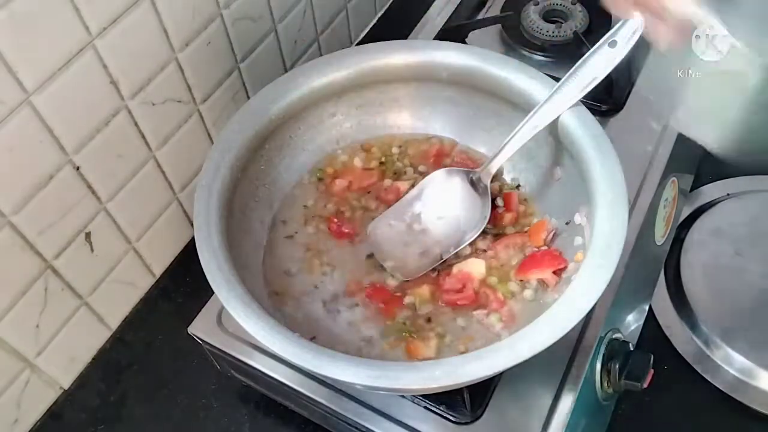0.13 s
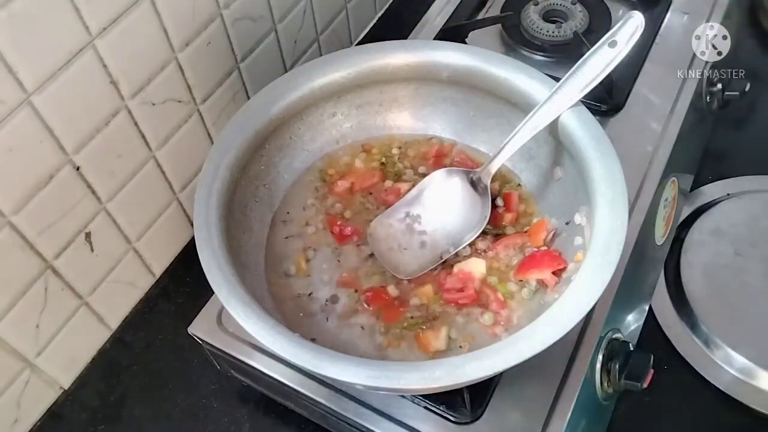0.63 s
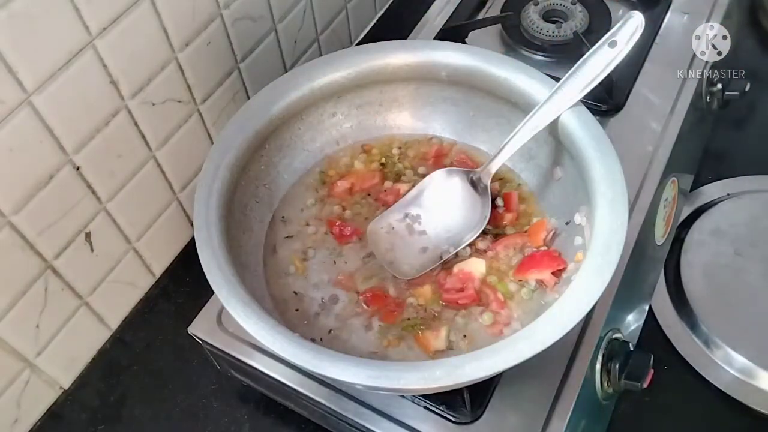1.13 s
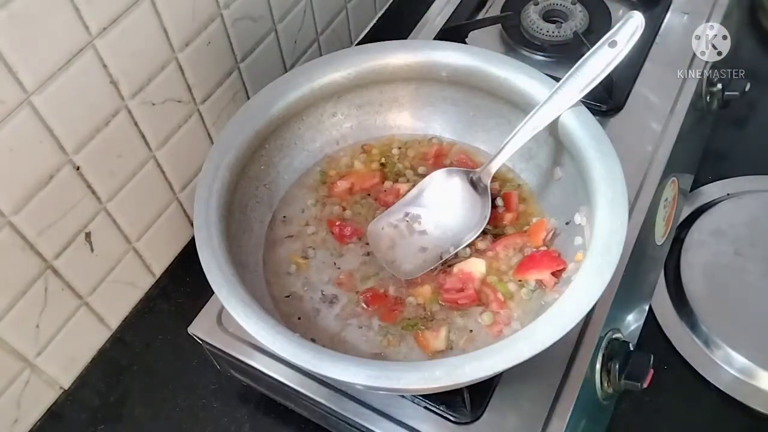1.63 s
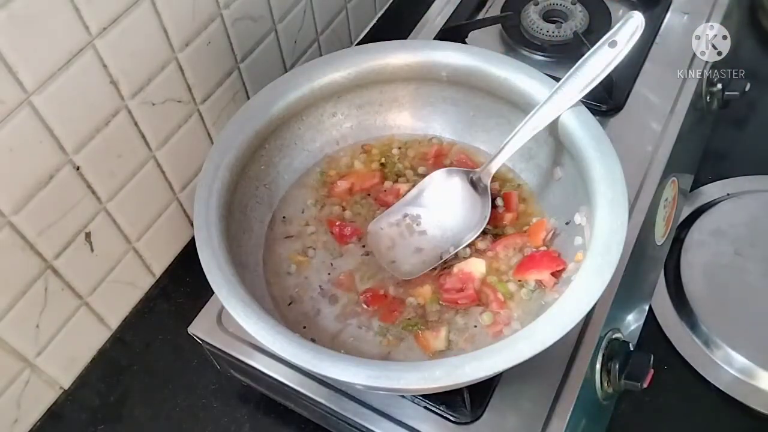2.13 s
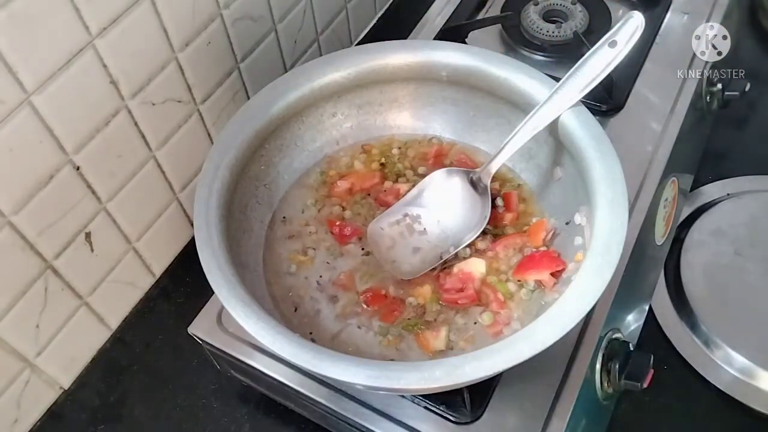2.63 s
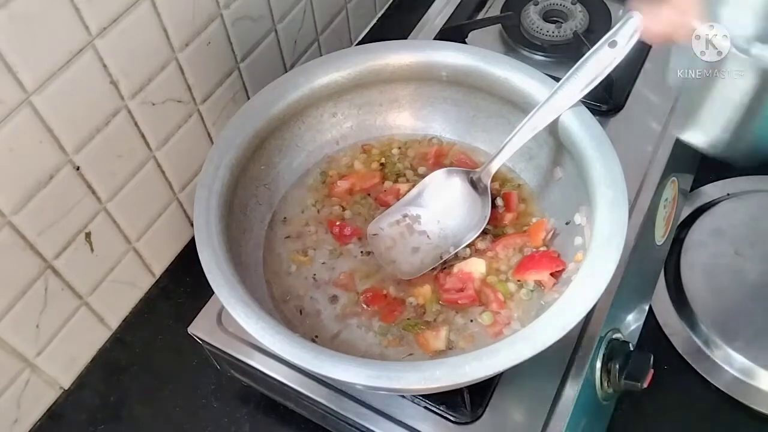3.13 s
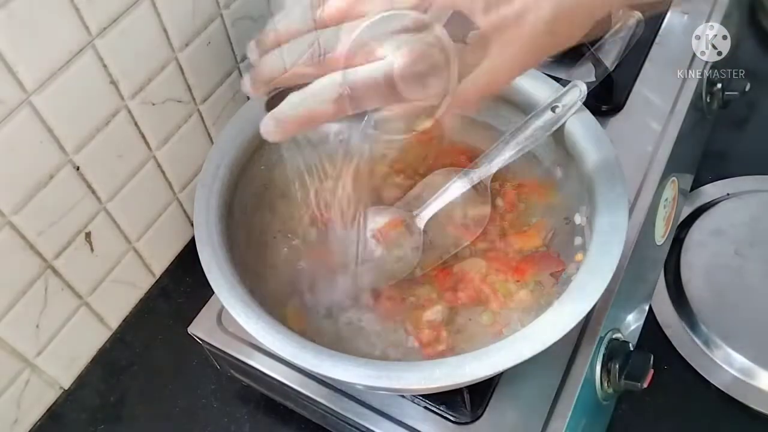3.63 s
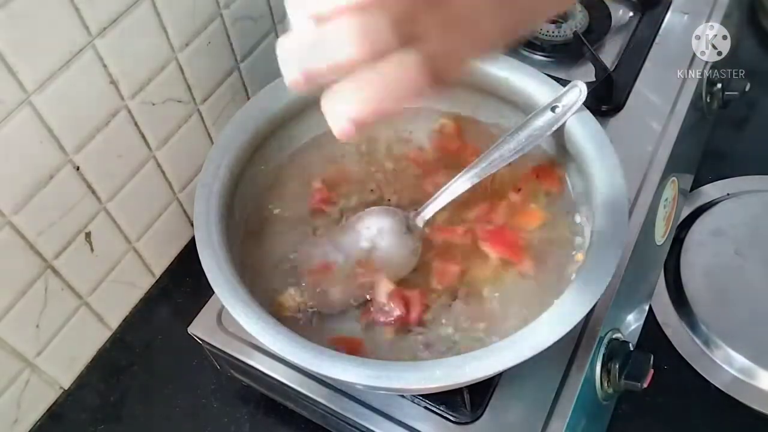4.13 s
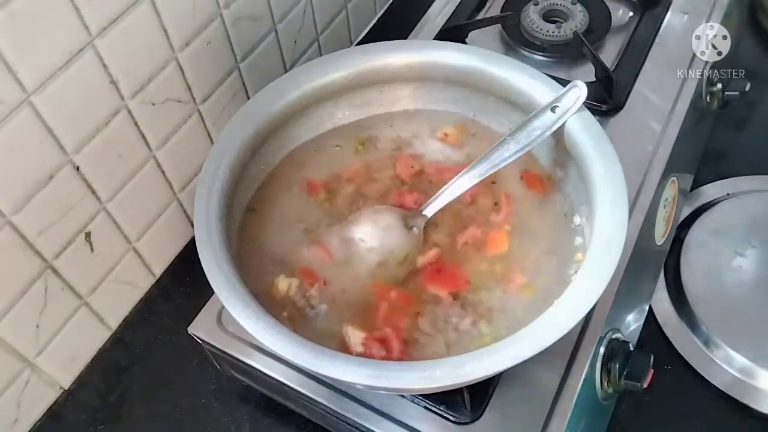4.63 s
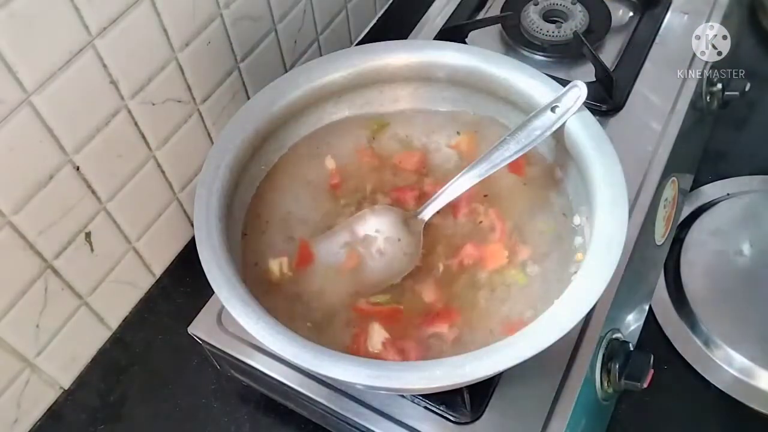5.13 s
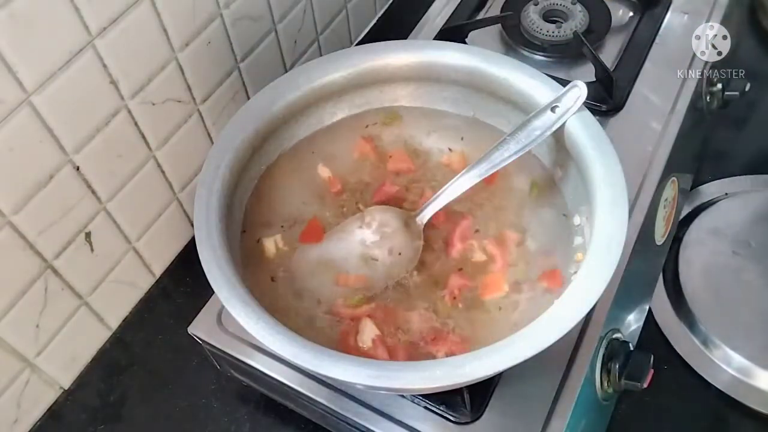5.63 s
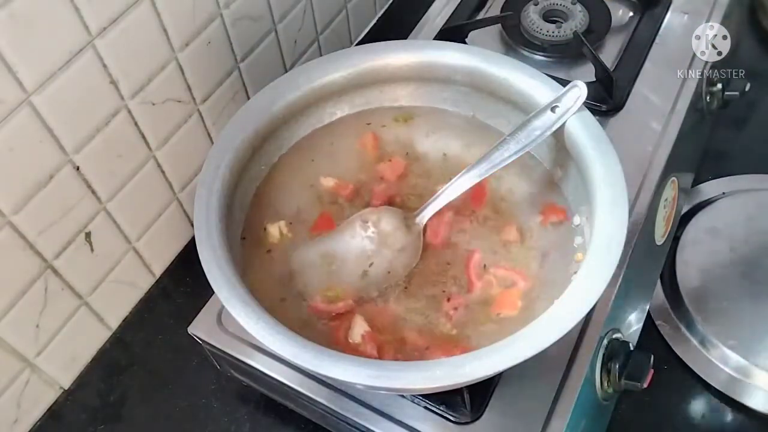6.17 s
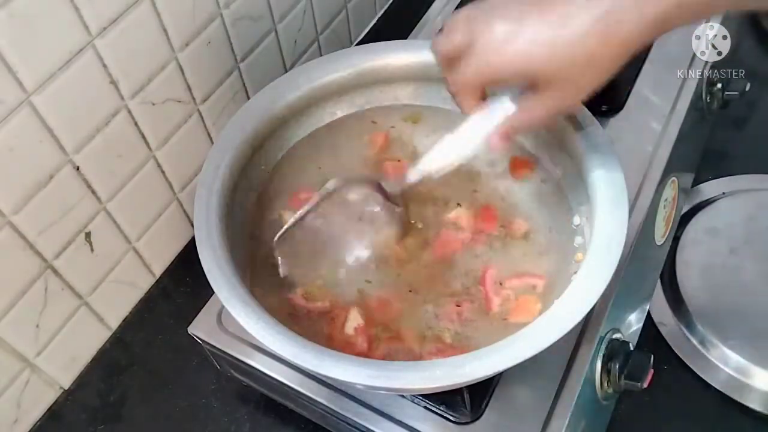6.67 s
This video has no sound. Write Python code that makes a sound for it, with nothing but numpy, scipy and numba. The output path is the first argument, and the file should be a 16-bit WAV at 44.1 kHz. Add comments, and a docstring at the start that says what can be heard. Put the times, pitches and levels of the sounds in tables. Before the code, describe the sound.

In a small, hard-tiled kitchen, heard close by a phone, a flickering hiss, low roar and steady hum sit over a faint rumble, easing during the first second. A very faint clink comes at 0.7 s. At about 0.95 s water splashes, crisp and hissing, with ticking drops and bubbling gurgles thinning by 2.3 s. A bright metallic lid clank rings at 2.4 s, then it grows quieter. A second, sharper splash bursts at 3.4 s, gurgling and pattering away until about 4.6 s. A steel tumbler is set down with a ringing clank at 5.05 s, a light knock follows, and it slides with a short scrape around 5.5 s. The hiss and roar swell near 6.1 s and sink. From 6.47 s a spoon strikes the pan in rapid loud knocks, ringing, then drags roughly through it with a low thump until the end at about 6.8 s.

```python
"""A changing hiss, low roar and hum are heard over a rumble in a small tiled kitchen, close to a phone; then
water splashes twice, probably from a tap into a tumbler. The hiss is flickering filtered noise, drops are
decaying tones with puffs of noise, bubbles are short rings of rising pitch. Steel ware is set down, slid
and knocked as decaying modes, and at the end a spoon strikes a pan and drags through it: a rough force
drives the pan's resonances."""
import sys
import numpy as np
from scipy import signal
from scipy.fft import rfft, irfft, next_fast_len
from scipy.io import wavfile
from scipy.ndimage import uniform_filter1d
from numba import njit

SR = 44100
rng = np.random.default_rng(int(sys.argv[2]) if len(sys.argv) > 2 else 0)


def gain_from_decibels(decibels):
    """Convert decibel values to linear amplitude factors."""
    exponent = np.asarray(decibels, float) / 20
    return 10 ** exponent


def output_pcm(signal):
    """Save a mono or channel-first signal as 16-bit PCM at the path in sys.argv[1].

    Samples are clipped to [-1, 1] before scaling.
    """
    pcm = np.clip(np.atleast_2d(signal).T, -1, 1) * 32767
    wavfile.write(sys.argv[1], SR, np.round(pcm).astype(np.int16))


N = 298992
M = next_fast_len(N)
HZ = np.fft.rfftfreq(M, 1 / SR)
T = np.arange(N) / SR


def table(points, hz=HZ):
    """Interpolation along a logarithmic frequency axis, holding the end values."""
    f, v = np.transpose(points)
    return np.interp(np.log(hz + 1), np.log(f), v)


def level_at(points, **outside):
    """Gain over time: the level of a (t/s, level/dB) table is interpolated in decibels."""
    s, db = np.transpose(points)
    return gain_from_decibels(np.interp(T, s, db, **outside))


def curves(rows):
    """Gains over time of a (t/s, level/dB, ..) table, silent outside its span."""
    s, *columns = np.transpose(rows)
    return np.array([gain_from_decibels(np.interp(T, s, c, left=-120, right=-120)) for c in columns])


def unit(x):
    """Normalisation to rms 1."""
    return x / np.sqrt(np.mean(x ** 2))


def colour(x, points):
    """Spectral shaping: filter by a level/dB curve over f/Hz, then scale to rms 1."""
    return unit(irfft(rfft(x, M) * gain_from_decibels(table(points)), M)[..., :N])


# Correlation of left and right noise: f/Hz, correlation (0-1)
CORRELATION = [(60, 0.45), (130, 0.71), (290, 0.7), (640, 0.34), (1410, 0.05), (3100, 0), (6820, 0.08),
               (15000, 0)]


def two_noises():
    """Diffuse field: left and right noise are partly alike in the bass, nearly unrelated in the treble."""
    mid, side = rfft(rng.standard_normal((2, M)))
    c = np.clip(table(CORRELATION), 0, 1)
    sides = np.sqrt(1 + c) * mid + np.sqrt(1 - c) * side * np.array([[1], [-1]])
    return unit(irfft(sides, M)[:, :N])


def resonances(x, peaks):
    """Forced vibration: a sum of resonances, each f/Hz, width/Hz, centre gain/dB."""
    return sum(gain_from_decibels(db) * signal.lfilter(*signal.iirpeak(hz, hz / w, SR), x) for hz, w, db in peaks)


def walk(rate):
    """Random fluctuation: values drawn at a rate in 1/s and slewed twice; spread near 1."""
    k = int(SR / rate)
    held = np.repeat(rng.standard_normal(N // k + 1), k)
    return 0.72 * uniform_filter1d(uniform_filter1d(held, k), k)[:N]


def fade(t, t60):
    """Exponential decay: 60 dB in t60 s."""
    return gain_from_decibels(-60 * t / t60)


def add(out, s, sound):
    """Superposition: mix a sound in at s seconds."""
    i = int(s * SR)
    out[i:i + len(sound)] += sound[:N - i]


def thin(x):
    """High-pass filter: the grains carry no bass below about 400 Hz."""
    return signal.sosfilt(signal.butter(3, 400., "high", fs=SR, output="sos"), x)


def room(x, wet_db, pan_db=0.):
    """Room impulse response: direct sound, later at the left port, stove and wall echoes, the tiles' tail."""
    tail_t60_s, treble_t60_s, treble_hz, early_t60_s = 0.38, 0.29, 5000., 0.019
    tail_db, early_db, left_lag_samples = -1, 1.5, 13
    t, echoes = T[:SR // 2], two_noises()[:, :SR // 2]
    dull = signal.lfilter(*signal.butter(2, treble_hz, fs=SR), echoes)
    tail = dull * fade(t, tail_t60_s) + (echoes - dull) * fade(t, treble_t60_s)
    tail *= gain_from_decibels(tail_db) / np.sqrt(tail_t60_s)
    early = echoes * gain_from_decibels(early_db) * fade(t, early_t60_s) / np.sqrt(early_t60_s)
    onset = np.minimum(t / 0.0022, 1)
    # the last root sets the energy of a decay independent of its length
    reply = gain_from_decibels(wet_db) * (early + tail) * onset * np.sqrt(6 * np.log(10) / SR)
    reply[[0, 1], [left_lag_samples, 0]] += 1  # direct sound
    pan = gain_from_decibels(np.array([[pan_db], [-pan_db]]) / 2)
    return signal.fftconvolve(x[None], reply, axes=1)[:, :N] * pan


@njit
def grains(starts, hz, cycles, glide, size, n, sr):
    """Damped oscillation: each grain falls by 1/e per `cycles` periods while its pitch climbs."""
    out = np.zeros(n)
    for k in range(len(starts)):
        phase, step, a = 0., 2 * np.pi * hz[k] / sr, size[k]
        loss = np.exp(-hz[k] / sr / cycles[k])
        for i in range(starts[k], min(n, starts[k] + int(6 * cycles[k] * sr / hz[k]))):
            out[i] += a * np.sin(phase)
            phase, step, a = phase + step, step * (1 + glide * hz[k] / sr), a * loss
    return out


def shower(level_db, busy, per_s, lo_hz, hi_hz, cycles, glide, spread_db):
    """Poisson-like process: grains at random moments, as dense as busy (0-1), of scattered pitch and size."""
    chance = rng.random((5, N))
    starts = np.flatnonzero(chance[0] < per_s * busy / SR)
    pitch, life, size = chance[1:4, starts]
    hz = lo_hz * (hi_hz / lo_hz) ** pitch
    size_db = level_db[starts] + np.minimum(-spread_db * np.log(size + 1e-9), 14)
    return grains(starts, hz, cycles * (0.22 + life), glide, gain_from_decibels(size_db), N, SR)


# Spectra of the two bass layers: f/Hz, relative density level/dB per Hz
DEEP_SPECTRUM = [(76, -45.5), (130, -26), (167, -0.5), (226, -8.5), (274, -1.5), (340, -8.5), (440, -7),
                 (750, -120)]
RUMBLE_SPECTRUM = [(15, -46), (25, -27), (53, 0), (75, 0.5), (102, -1), (150, -36), (200, -36), (330, -120)]
# Dull swells from stove, counter and hands: centre t/s, length/s, deep level/dB, rumble level/dB
BASS_SWELLS = [(.17, 0.16, -64, -70), (1.1, 0.25, -85, -71), (1.336, 0.24, -66, -67),
               (1.463, 0.57, -85, -68), (2.14, .12, -72, -71), (2.506, 0.89, -68, -70),
               (2.854, 0.13, -61.5, -82), (3.364, 0.14, -58, -72), (4.23, 0.28, -68, -83),
               (4.553, 0.46, -83, -59.5), (4.856, 0.089, -68, -65), (5.174, 0.32, -59, -59),
               (5.543, 0.17, -64, -75), (5.98, 0.35, -56.5, -82), (6.083, 0.14, -56.5, -66),
               (6.202, 0.45, -60.5, -66), (6.761, 0.27, -46, -45)]


def thumps():
    """Addition of powers: two layers of steady bass noise swell smoothly at each thump."""
    steady_db = [[-70.5], [-75]]  # deep, rumble
    power = np.ones((2, N)) * gain_from_decibels(steady_db) ** 2
    for s, length, *db in BASS_SWELLS:
        swell = np.cos(np.pi * np.clip((T - s) / length, -.5, .5)) ** 4
        power += gain_from_decibels(np.array(db))[:, None] ** 2 * swell
    deep, rumble = np.sqrt(power)
    return colour(two_noises(), DEEP_SPECTRUM) * deep + colour(rng.standard_normal(N), RUMBLE_SPECTRUM) * rumble


# Resonances of the hum: f/Hz, width/Hz, relative level/dB
HUM_RESONANCES = [(188.3, 8.4, -43), (420, 11.7, -43), (704, 14, -43), (863, 11.6, -40.5),
                  (1125, 28, -43.5)]
# Gain applied to the whole hum: t/s, level/dB
HUM_GAIN = [(0, 13.5), (.8, 10), (1.5, 9), (2.8, -8), (4.6, -6.5)]


def hum():
    """Noise-driven resonance: random noise excites a few narrow resonances."""
    return resonances(two_noises(), HUM_RESONANCES) * level_at(HUM_GAIN)


# Spectra of the dense faint modes: f/Hz, relative density level/dB per Hz
LID_SPECTRUM = [(76, -51.5), (130, -25), (179, -3.5), (291, -15), (356, 1.5), (491, -13), (780, -14),
                (1610, -16.5), (2410, 0.5), (5850, -1), (6340, 0.5), (8740, 2), (16000, -8.5)]
TUMBLER_SPECTRUM = [(60, -10), (300, -6), (900, 2.5), (2500, -4), (4500, -11.5), (9000, -13), (16000, -10)]
# Clear modes of each piece: f/Hz, relative level/dB, t60/s
LID_MODES = [(420, -38, 0.16), (458, -38, 0.81), (802, -37, 0.93), (2240, -26, 0.23), (3005, -29.5, 0.59),
             (3540, -18, 0.48), (4500, -33, .2), (5530, -14, 0.19), (6150, -29, 0.23), (7280, -22, 0.14),
             (8800, -4.5, 0.16), (9800, -2, 0.055), (10850, -1, 0.063), (12500, -3, 0.047)]
TUMBLER_MODES = [(829, -3, 0.34), (900, -1.5, 0.26), (991, -3.5, 0.29), (1105, -9.5, 0.28),
                 (1267, -13, 0.27), (1943, 3, 0.16), (3444, -4.5, 0.15), (5770, -5, 0.082),
                 (7852, -1, 0.21), (8936, -4, 0.21), (10630, -6, 0.16), (12750, -19, 0.16),
                 (14740, -9, 0.12)]
CLINK_MODES = [(1784, 8.5, 0.37), (2660, -16, 0.37), (3170, -2, 0.42), (5100, 0, 0.093), (8390, 0, 0.64),
               (9440, -14, 4.2)]
# Blows: t/s, level/dB, softness/(dB lost per squared octave from 1.7 kHz)
LID_BLOWS = [(2.4012, -11.5, 0)]
TUMBLER_BLOWS = [(5.05, -10.5, 0), (5.062, -19, 1.5), (5.2, -35.5, 3)]
CLINK_BLOWS = [(0.7225, -44, 0)]  # a faint clink


def steel(hits, modes, crash, crash_db, crash_t60):
    """Modal superposition: a blow rings clear modes as close beating groups, over a crash of faint ones."""
    out, t, dense = np.zeros(N), T[:SR // 2], colour(rng.standard_normal(N), crash)
    hz, db, t60 = np.transpose(modes)[:, :, None]
    for s, hit_db, soft_db in hits:
        split, turn = rng.random((2, 3, len(modes), 1))  # three partials to each mode
        partial_hz = hz + (57.0 + 0.008 * hz) * (split - .5)
        mode_gain = gain_from_decibels(db - soft_db * np.log2(hz / 1700.0) ** 2)
        partials = mode_gain * np.sin(2 * np.pi * (partial_hz * t + turn)) * fade(t, t60)
        ring = np.sum(partials, axis=(0, 1))
        faint = gain_from_decibels(crash_db - 2 * soft_db) * dense[:len(t)] * fade(t, crash_t60)
        blow = ring / np.max(np.abs(ring)) + faint
        add(out, s, gain_from_decibels(hit_db) * blow * np.minimum(t / 0.00087, 1))
    return out


def steel_ware():
    """Impact excitation: the lid and tumbler are set down, and a faint clink sounds."""
    lid = steel(LID_BLOWS, LID_MODES, LID_SPECTRUM, -10.5, 0.28)
    tumbler = steel(TUMBLER_BLOWS, TUMBLER_MODES, TUMBLER_SPECTRUM, -19.0, 0.34)
    clink = steel(CLINK_BLOWS, CLINK_MODES, LID_SPECTRUM, -7.0, .2)
    return lid + tumbler + clink


def contact(curve, hits, hit_t60, hit_db, dull_hz):
    """Rough contact force: low-passed rubbing along a curve, and a decaying rattling burst for each blow."""
    grit = rng.standard_normal(N) * gain_from_decibels(1.73 * walk(120))
    rubbing = unit(signal.lfilter(*signal.butter(1, dull_hz, fs=SR), grit))
    force = rubbing * level_at(curve, left=-120, right=-120)
    for s, db in hits:
        add(force, s, gain_from_decibels(db + hit_db) * grit[:SR // 3] * fade(T[:SR // 3], hit_t60))
    return force


# Rubbing force along the counter: t/s, relative level/dB
SLIDE_FORCE = [(5.33, -80.5), (5.4, -63.5), (5.45, -47.5), (5.5, -41), (5.55, -44), (5.6, -53), (5.65, -87),
               (5.72, -70)]
# Resonances of the rubbed ware: f/Hz, width/Hz, relative level/dB
SLIDE_RESONANCES = [(671, 5.7, 4.5), (803, 19, -7), (1165, 6.6, -2), (1910, 20, -5), (2996, 64, -6),
                    (4260, 51, -14), (5370, 77, -21), (6030, 65, -16), (7030, 75, -10.5), (8540, 124, -1),
                    (10500, 90, -22)]


def slide():
    """Friction excitation: thin steel ware rubbed along the counter resonates over broad grit."""
    force = contact(SLIDE_FORCE, [], .1, 0., 10200.0)
    return gain_from_decibels(19.5) * resonances(force, SLIDE_RESONANCES) + gain_from_decibels(-4.0) * force


# Dragging force of the spoon: t/s, relative level/dB
SPOON_DRAG = [(6.56, -25.5), (6.574, -35), (6.642, -42), (6.72, -43), (6.78, -44.5)]
# Blows of the spoon: t/s, relative level/dB
SPOON_BLOWS = [(6.473, -8.5), (6.502, -13.5), (6.527, -12.5), (6.554, -27), (6.579, -21.5), (6.64, -30),
               (6.755, -31.5)]
# Resonances of the pan: f/Hz, width/Hz, relative level/dB
PAN_RESONANCES = [(374, 3, 2), (404.5, 2.3, 5.5), (534, 10.7, -2.5), (630, 19, -1), (814, 6.5, -7),
                  (903.5, 19, 1), (1210, 7.7, 2), (1625, 68, -5), (1870, 63, -6.5), (2750, 120, -12.5),
                  (3630, 68, -12), (4500, 40, -31), (5400, 68, -27), (6710, 71, -17), (7700, 93, -12),
                  (8100, 240, -14.5), (8770, 230, -3.5), (9000, 40, -16), (9450, 60, -17), (11300, 49, -15),
                  (11100, 50, -20), (13400, 80, -19)]
# Spectrum of the pan's many faint modes: f/Hz, relative density level/dB per Hz
PAN_SPECTRUM = [(76, -67), (130, -45), (328, -24), (370, -12), (780, -7.5), (881, -5.5), (2830, -4),
                (4150, -11), (8570, -5.5), (15100, -10), (16000, -33)]


def spoon():
    """Forced modal response: blows and drag ring the pan; its many faint modes add a broad crash."""
    force = contact(SPOON_DRAG, SPOON_BLOWS, 0.14, -4.5, 1130.0)
    ring = gain_from_decibels(13.5) * resonances(force, PAN_RESONANCES)
    crash = gain_from_decibels(-3.5) * colour(force, PAN_SPECTRUM) * np.std(force)
    return ring + crash


# Swarms of bubbles under the stream: t/s, relative level/dB, f/Hz
BUBBLE_SWARMS = [(1.039, -29, 1053), (1.062, -34.5, 1066), (1.089, -35, 1070), (1.1139, -24, 3570),
                 (1.139, -33, 1057), (1.231, -33, 1040), (1.29, -27, 657), (1.2994, -26, 1235),
                 (1.309, -32, 640), (1.3857, -35, 1910), (1.4815, -33, 1276), (1.5354, -32, 1380),
                 (1.5994, -41, 2360), (1.69, -44.5, 991), (1.8986, -25.5, 3395), (1.9244, -34.5, 1560),
                 (1.9594, -39.5, 2240), (1.9959, -35, 1856), (3.3927, -23.5, 1323), (3.394, -23.5, 3085),
                 (3.4094, -30, 2130), (3.422, -38, 700), (3.4411, -25, 2564), (3.468, -35, 900),
                 (3.4894, -27.5, 1160), (3.493, -24.5, 654), (3.5194, -32, 2410), (3.529, -44, 753),
                 (3.569, -44, 630), (3.5794, -28, 1620), (3.6394, -33, 1600), (3.7623, -33, 2740),
                 (3.788, -34, 863), (3.817, -35, 900), (3.8212, -31.5, 1266), (3.844, -36, 771),
                 (3.8594, -37, 1530), (3.9634, -39, 1616), (4.0294, -40.5, 3290), (4.148, -46, 858),
                 (4.1899, -37, 2940)]


def gurgles():
    """Bubble resonance: like-sized bubbles ring briefly near one pitch, fading through each swarm."""
    swarm_s, swarm_s_per_ms = .035, 0.017  # swarm length, and its gain per ms of bubble period
    late, off, size = rng.random((len(BUBBLE_SWARMS), 3, 9)).transpose(1, 0, 2)
    s, db, hz = np.transpose(BUBBLE_SWARMS)[:, :, None]
    period_ms = 1000 / hz
    start_s = s + (swarm_s + swarm_s_per_ms * period_ms) * late ** 2
    starts = (start_s * SR).astype(int).ravel()
    pitch = (hz * (1 + 0.18 * (off - .5))).ravel()
    gain = gain_from_decibels(db - 4 - 14.7 * late - 11.6 * size).ravel()
    return grains(starts, pitch, 8.2 + .003 * pitch, 0.00168, gain, N, SR)


# Spectrum of the hiss, in the drops and in the wash: f/Hz, relative density level/dB per Hz
HISS_SPECTRUM = [(2940, -17.5), (5000, -11), (6600, -8.5), (7310, -2), (8580, 2), (11500, -6.5),
                 (14900, -6), (15600, 0.5), (16000, -29)]
# Splashing drops: t/s, click level/dB, f/Hz, relative level/dB of the puff of hiss
SPLASHING_DROPS = [(0.9392, -41, 9200, -41), (0.952, -18, 8870, -52), (0.977, -21, 14000, -56),
                   (1.0373, -14, 12200, -27.5), (1.115, -24.5, 8160, -51), (1.1852, -32, 7750, -40),
                   (1.2141, -24, 9700, -44), (1.228, -14.5, 8600, -47), (1.2417, -33, 8100, -35.5),
                   (1.278, -22, 7900, -46), (1.3293, -25, 9300, -35.5), (1.454, -34, 7450, -53),
                   (1.494, -20, 8800, -38), (1.5489, -22, 8160, -41), (1.6795, -30, 7900, -49.5),
                   (1.7796, -28.5, 8440, -63), (1.899, -47, 13900, -48), (1.925, -35, 8120, -51),
                   (1.997, -52, 8200, -56), (2.0213, -29, 8450, -45.5), (2.102, -29, 9100, -52),
                   (2.129, -37, 8500, -48), (2.2049, -50, 8850, -63), (2.242, -45, 9100, -52.5),
                   (2.2813, -33, 9000, -54), (2.577, -30, 7640, -60), (2.7875, -43.5, 6330, -67),
                   (2.83, -50, 12100, -52), (3.036, -38.5, 8200, -50.5), (3.204, -43, 7900, -56.5),
                   (3.337, -47, 9700, -46.5), (3.366, -44, 6660, -41), (3.3934, -9.5, 7540, -33),
                   (3.4363, -27, 8800, -33.5), (3.458, -13, 8540, -35.5), (3.489, -8.5, 8900, -31),
                   (3.5473, -20, 8000, -41), (3.6604, -32, 9000, -42.5), (3.746, -27, 8900, -47),
                   (3.8476, -31, 8550, -41), (3.9222, -24, 8300, -45), (4.001, -19, 8900, -51),
                   (4.019, -35, 8100, -44), (4.0614, -37, 8350, -49), (4.0986, -26, 8770, -49),
                   (4.187, -42, 8800, -46), (4.236, -25, 8910, -61), (4.284, -32, 9300, -58),
                   (4.3335, -29, 9200, -54)]


def splashing_drops():
    """Transient radiation: each drop is a decaying click and a puff of hiss strongest near its pitch."""
    click_t60_s, puff_t60_s = 0.0065, 0.089
    out, t, noise = np.zeros(N), T[:SR // 3], colour(rng.standard_normal(N), HISS_SPECTRUM)
    for s, db, hz, puff_db in SPLASHING_DROPS:
        click = np.sin(2 * np.pi * hz * t) * fade(t, click_t60_s)
        hiss = np.roll(noise, -int(s * SR))[:len(t)]
        puff = (1.1 * hiss + resonances(hiss, [(hz, 1500., 3.)])) * fade(t, puff_t60_s)
        add(out, s, gain_from_decibels(db) * click + gain_from_decibels(puff_db) * puff)
    return out


# Spectra of spray and low roar: f/Hz, relative density level/dB per Hz
SPRAY_SPECTRUM = [(1000, -29.5), (1700, -4.5), (1920, -9.5), (2680, -7.5), (4810, -13), (6000, -19),
                  (7800, -35), (13200, -120)]
ROAR_SPECTRUM = [(200, -49), (340, -8), (493, -7), (853, -1), (967, -6.5), (1160, -0.5), (2000, -15),
                 (2600, -28), (4400, -120)]
# Changing background noise: t/s, then level/dB of hiss, spray and low roar before flicker;
# the spoon's drag is in the last rows
BACKGROUND_NOISE = [(0.0, -47, -54, -51.5), (0.28, -47, -54, -49.5), (0.45, -52.5, -57.5, -53),
                    (0.68, -53.5, -60, -56.5), (0.9, -59.5, -60, -59.5), (1.7, -56, -57, -60.5),
                    (2.33, -58, -63.5, -64.5), (2.7, -62.5, -70.5, -67), (2.87, -64, -72.5, -65),
                    (3.02, -64, -74.5, -74.5), (3.3, -63.5, -72.5, -71.5), (4.45, -53.5, -64, -73),
                    (4.72, -56, -69, -71), (4.85, -50, -68, -71.5), (5.0, -58, -68, -74),
                    (5.25, -57.5, -77, -64.5), (5.5, -51.5, -53, -65), (5.78, -49.5, -58.5, -59),
                    (6.08, -44, -50, -48), (6.21, -48, -52, -49.5), (6.38, -52.5, -58.5, -55),
                    (6.45, -66.5, -70, -69), (6.55, -52, -82, -31), (6.7, -39, -70, -41.5),
                    (6.78, -42, -66, -37)]
# Two splashing pours of water, each: t/s, then level/dB of hiss, spray and low roar before flicker
SPLASHING_POURS = [
    [(0.92, -57, -82, -64), (0.98, -35.5, -95, -60), (1.05, -29, -49, -75), (1.11, -40, -42, -66),
     (1.21, -36, -58, -54), (1.26, -39, -41.5, -65), (1.3, -35.5, -49, -44.5), (1.38, -40, -47.5, -54),
     (1.47, -52, -64, -56.5), (1.6, -41.5, -56, -63), (1.7, -88, -81, -79)],
    [(3.3, -71, -82, -69), (3.38, -41, -51, -72), (3.42, -34.5, -36, -41.5), (3.47, -29.5, -39, -42),
     (3.55, -34.5, -41.5, -47.5), (3.62, -37.5, -41.5, -47), (3.68, -40, -45.5, -53.5),
     (3.78, -37.5, -47, -57), (3.89, -45, -51.5, -73), (4.04, -47.5, -52.5, -63.5),
     (4.2, -46.5, -52, -64.5), (4.44, -47.5, -67, -66), (4.6, -64, -83, -85)],
]
# Water falling: t/s, share of the full droplet rate (0-1)
WATER_FALLING = [(.9, .03), (.95, 1), (2.3, 0.75), (2.4, 0.13), (3.3, 0.56), (3.4, 0.79), (4.4, 0.36),
                 (4.7, 0)]


def water_and_wash():
    """Turbulent noise: hiss, spray and roar flicker; while water falls, droplets and bubbles crowd in."""
    power = sum(curves(rows) ** 2 for rows in [BACKGROUND_NOISE] + SPLASHING_POURS)
    hiss_db, spray_db, roar_db = 10 * np.log10(power)
    falling = np.clip(np.interp(T, *np.transpose(WATER_FALLING)), 0, 1)
    drops = shower(hiss_db - 6.0, falling, 700., 5520.0, 15000., 4., 0.0037, 10.6)
    fizz = shower(spray_db + 1.0, falling, 300., 1791.0, 5530.0, 12.0, 0.00557, 1.9)
    bubbles = shower(roar_db + 0.1, falling, 120., 550., 1974.0, 20.0, .004, 3.0)
    smooth_db = -7. * falling  # the grains take over part of the noise
    flicker_db = 3.3 + 2.2 * falling  # falling water makes the noise unsteady
    hiss = colour(two_noises(), HISS_SPECTRUM) * gain_from_decibels(hiss_db + smooth_db + flicker_db * walk(30))
    spray = colour(two_noises(), SPRAY_SPECTRUM) * gain_from_decibels(spray_db + smooth_db + flicker_db * walk(40))
    roar = colour(two_noises(), ROAR_SPECTRUM) * gain_from_decibels(roar_db + smooth_db + flicker_db * walk(22.03))
    return hiss + spray + roar + room(thin(drops + fizz + bubbles), -1.3)


def scene():
    """Direct-to-reverberant balance: drops are close and dry, ware rings in the room, the wash is diffuse."""
    background = thumps() + hum()
    struck = room(thin(gurgles()) + steel_ware(), .1)
    rubbed = room(slide(), -1.5) + room(spoon(), -1.85, pan_db=4.0)
    return background + struck + rubbed + room(splashing_drops(), -6.5) + water_and_wash()


def low_pass(x):
    """Removes everything above the highest recorded frequency."""
    return signal.sosfilt(signal.butter(12, 16830, fs=SR, output="sos"), x)


# Level difference of the two ports: f/Hz, left minus right level/dB
PORT_DIFFERENCE = [(60, 0), (110, 4.5), (200, -3.5), (380, -4), (700, -2), (1290, -2), (2380, -2.5),
                   (4400, -7), (8120, -19.5), (15000, -5)]
# Upper band limit: f/Hz, level/dB
BAND_LIMIT = [(15000, -1), (15500, -1.5), (15750, -31), (17000, -40.5)]


def record(dry):
    """Frequency response: the left port is duller, the top is cut off steeply, a small offset is added."""
    ratio = gain_from_decibels(table(PORT_DIFFERENCE))
    # the port weights keep a constant sum of squares
    ports = np.sqrt(2 / (1 + ratio ** 2)) * np.array([ratio, ratio ** 0]) * gain_from_decibels(table(BAND_LIMIT))
    mix = irfft(rfft(dry, M) * ports, M)[:, :N] + 0.00051
    return low_pass(mix)


dry = scene()
out = record(dry)
output_pcm(out)
```